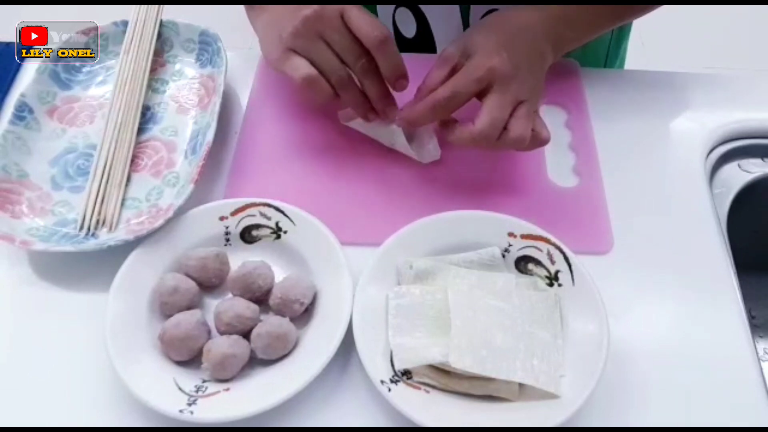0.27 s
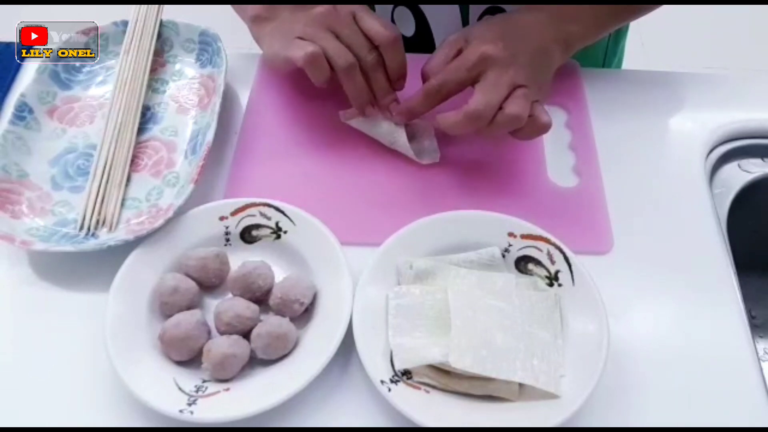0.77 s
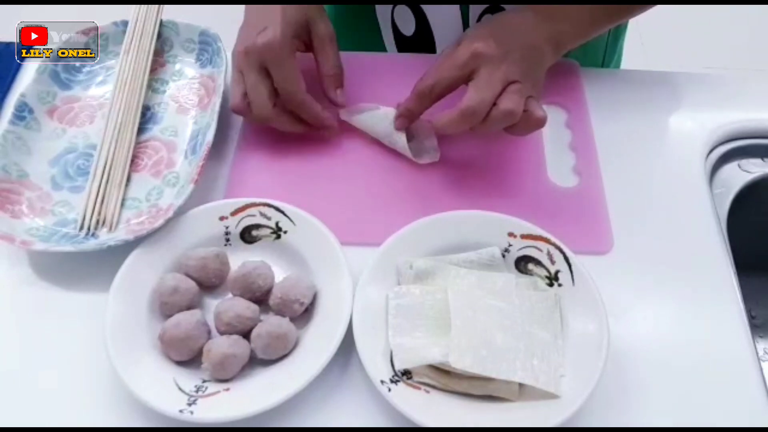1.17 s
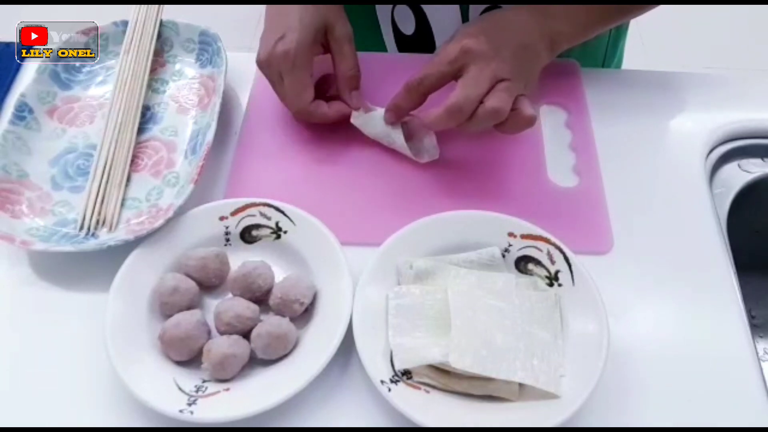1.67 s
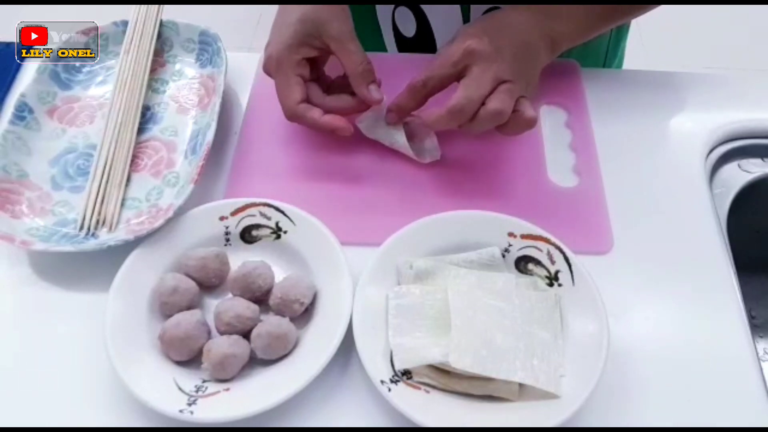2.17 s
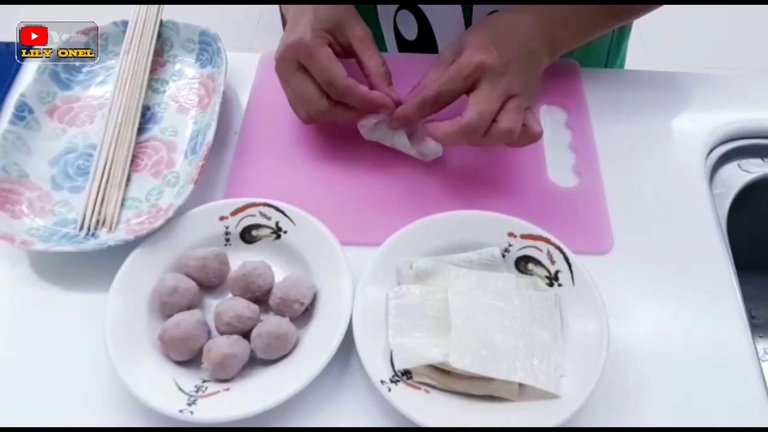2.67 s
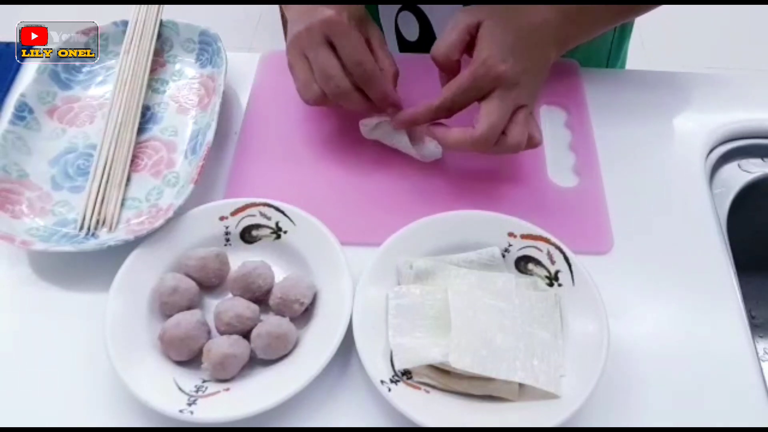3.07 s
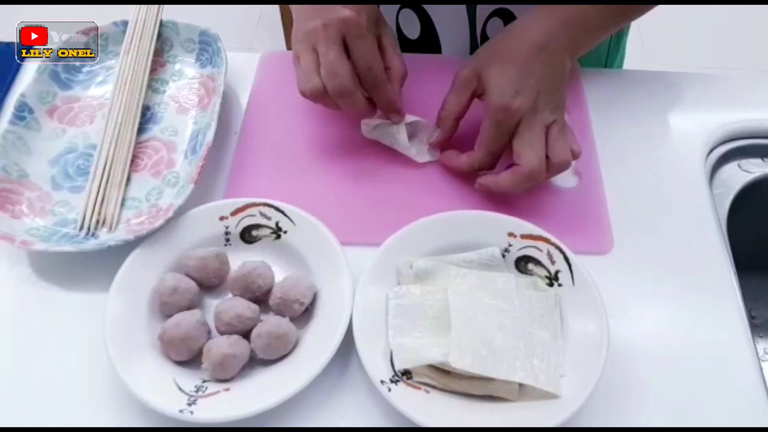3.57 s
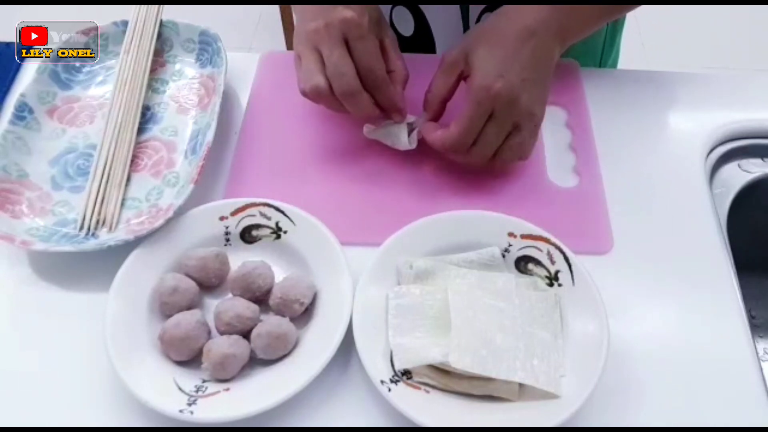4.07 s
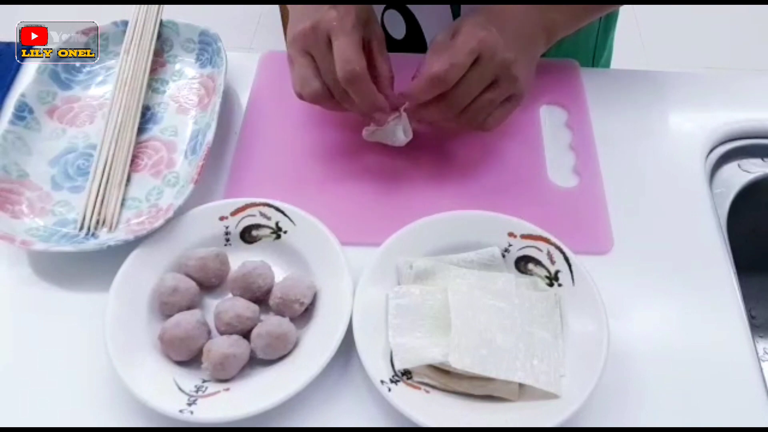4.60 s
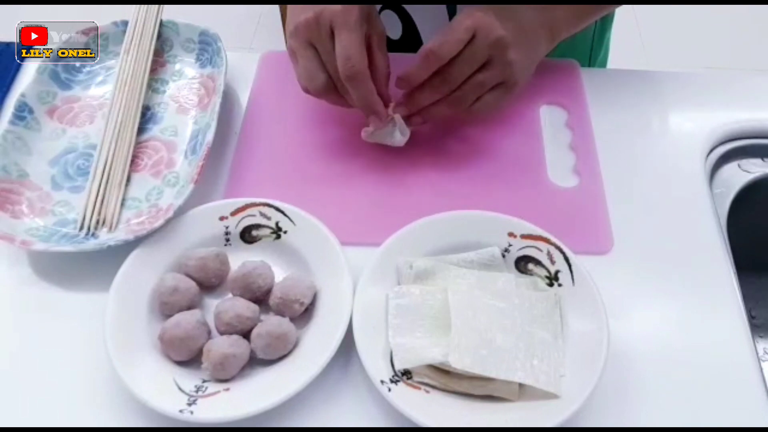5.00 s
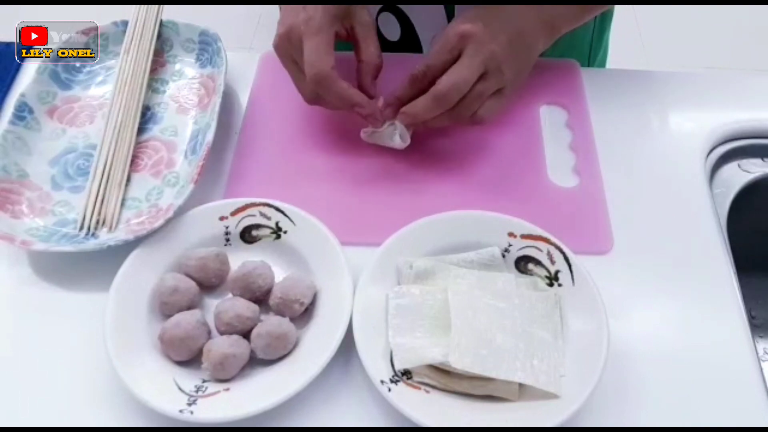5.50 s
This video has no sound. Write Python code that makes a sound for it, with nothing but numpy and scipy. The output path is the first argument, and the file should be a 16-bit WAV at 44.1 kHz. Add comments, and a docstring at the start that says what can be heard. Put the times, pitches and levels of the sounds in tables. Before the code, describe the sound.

Constant low electrical hum with a lightly fluttering buzz and airy fan drone, with a few faint finger taps, short skin rubs and thin wrapper rustles.

```python
"""A refrigerator compressor hums and buzzes in a quiet kitchen, with a mains tone, over the low drone of a fan.
Someone folds a pastry wrapper on a plastic cutting board; fingers softly knock and rub it a few times.
Machines: repeated shaft-turn waveform, mains harmonics, wavering tones and shaped noise.
Hands: impulses and stick-slip friction ring the board's modes; the wrapper is grainy noise, all in a short room tail."""
import sys
import numpy as np
from scipy import signal
from scipy.fft import rfft, irfft
from scipy.io import wavfile

SR = 44100
rng = np.random.default_rng(int(sys.argv[2]) if len(sys.argv) > 2 else 0)


def inscribe(sig):
    """Save sig as 16-bit PCM at rate SR to the path in sys.argv[1].

    A 1-D sig is mono; a 2-D sig holds one channel per row.
    Samples are clipped to [-1, 1] before scaling.
    """
    pcm = np.round(np.clip(np.atleast_2d(sig).T, -1, 1) * 32767)
    wavfile.write(sys.argv[1], SR, pcm.astype(np.int16))


N = 253310
SHAFT_HZ, MAINS_HZ, TOP_HZ = 59.275, 60, 15300
FREQS = np.arange(N // 2 + 1) * SR / N
TIME = np.arange(N) / SR
# Signs of one quantity split evenly between left and right
LEFT_RIGHT = np.array([[1], [-1]])


def undb(db):
    """Decibels to gain."""
    return 10 ** (np.asarray(db) / 20)


def unit(x):
    """Scale to an rms of 1."""
    return x / np.sqrt(np.mean(x ** 2))


def pan(left_minus_right_db):
    """Left and right gains for a level difference."""
    return undb(LEFT_RIGHT / 2 * left_minus_right_db)


def along(table, hz):
    """The columns of a spectrum table, interpolated on a log-frequency axis."""
    points_hz, *columns = np.transpose(table)
    return [np.interp(np.log(hz + 1), np.log(points_hz), column) for column in columns]


def resonance(hz, width_hz):
    """Complex response of one resonance, gain 1 at its centre."""
    damping = 1j * FREQS * width_hz
    return damping / (hz ** 2 - FREQS ** 2 + damping)


def walk(rate_hz):
    """Random drift with an rms of 1: noise under a Gaussian low-pass, without its mean."""
    lowpass = np.exp(-(FREQS / rate_hz) ** 2) * (FREQS > 0)
    return unit(irfft(rfft(rng.standard_normal(N)) * lowpass, N))


def diffuse(apart_hz):
    """Spectra of room noise at two microphones: alike in the bass, unrelated in the treble."""
    mid, side = rfft(rng.standard_normal((2, N)))
    alike = 1 / (1 + (FREQS / apart_hz) ** 4)
    return mid * np.sqrt((1 + alike) / 2) + LEFT_RIGHT * side * np.sqrt((1 - alike) / 2)


def fan(side_db=3.5, swell_db=4.0):
    """Narrow resonances waver in pitch and strength over a broad rush of air."""
    # Narrow tones, from drone to thin whine. Each row: frequency in Hz, width in Hz, level in dB rms.
    drone_tones = [(106.9, 3.36, -44.5), (119.9, 3.5, -58.5), (142.65, 5.35, -43), (147.9, 1, -41.5),
                   (159.9, 9, -48), (276.7, 1.6, -59.5), (325.3, 6.2, -57.5), (582, 5.4, -66),
                   (664.4, 2.26, -62.5), (9970, 74, -72)]
    # Moving air and faint hiss. Each row: frequency in Hz, density in dB per Hz, left minus right in dB.
    air_curve = [(15, -77, 0), (45, -67, 0), (95, -64, 1), (130, -59, 1.5), (210, -65, 2), (295, -75, 1),
                 (390, -73.5, 2), (500, -80.5, 2), (630, -79, 3), (720, -84, 3), (830, -86, 3),
                 (1050, -84.3, 4), (1400, -88.5, 6), (1545, -82.5, 5), (1800, -87, 4), (2100, -91.5, 2),
                 (2360, -89.5, 2), (2600, -93.5, 2), (2950, -96.5, 2), (4600, -101.5, 4), (7400, -100.5, 7),
                 (7950, -104, 4), (9900, -97.5, 0), (10300, -103, 0), (11000, -99.5, 0), (15000, -101, 0)]
    drone = 0
    for hz, width_hz, db in drone_tones:
        tone_hz = hz + width_hz / 2 * walk(2 * width_hz)
        tone = np.sin(2 * np.pi * np.cumsum(tone_hz) / SR)
        drone = drone + undb(db) * unit(tone * undb(swell_db * walk(2 * width_hz)))
    air_db, air_side_db = along(air_curve, FREQS)
    air_spectra = diffuse(apart_hz=397) * undb(air_db) * pan(air_side_db)
    air = irfft(air_spectra, N) * np.sqrt(SR / 2)  # density per Hz to samples
    return drone * pan(side_db) + air


def windings(side_db=3):
    """Magnetic hum: clean tones at even multiples of the mains rate."""
    # Each row: multiple of the mains rate, level in dB rms.
    mains_lines = [(2, -62), (4, -48.5), (6, -69), (8, -68), (10, -66)]
    tones = 0
    for multiple, db in mains_lines:
        turns = multiple * MAINS_HZ * TIME + rng.random()
        tones = tones + undb(db) * np.sin(2 * np.pi * turns)
    return np.sqrt(2) * tones * pan(side_db)


def compressor_lines(scatter_db=1.5, skew_limit_rad=0.69, opposed_skew_rad=2.89, port_lag_s=.00058):
    """Complex left and right strength of each multiple of the shaft rate, as the casing rattles every turn."""
    # Lines with their own level, most of them strong, a few faint.
    # Each row: multiple of the shaft rate, level in dB rms, left minus right in dB.
    hum_lines = [(1, -31.2, 1.8), (2, -52.0, 5.0), (3, -40.6, -0.4), (4, -56.7, 4.4), (5, -59.8, -0.2),
                 (6, -54.8, 0.7), (7, -59.2, 6.4), (8, -59.7, 5.1), (9, -53.9, -1.6), (10, -55.1, -0.1),
                 (11, -58.2, -4.6), (12, -62.0, -0.9), (13, -71.5, 12), (14, -80, 6), (15, -54.1, 3.7),
                 (16, -70.5, -11.2), (17, -68.7, 5.1), (18, -58.5, 4), (19, -63, 4.5), (20, -79, 6),
                 (21, -64, 14.4), (22, -62.6, 15.2), (23, -70.9, 9.6), (25, -71.2, 15.6), (26, -61.5, 18.5),
                 (27, -61.6, 2.2), (28, -60.8, 20.8), (29, -59.5, -3.0), (30, -69.3, 9.2),
                 (32, -68.7, 13.7), (33, -71.6, 11.5), (34, -71.4, 18.8), (38, -67.2, 5.9),
                 (39, -67.6, 8.7), (40, -63.4, -0.7), (41, -66.4, 1.3), (42, -68.7, 7.6), (84, -77, 5),
                 (98, -75.5, 6), (169, -74.5, 3), (186, -83, 2)]
    # All other lines. Each row: frequency in Hz, level of one line in dB rms, left minus right in dB.
    buzz_curve = [(770, -75, 10), (2000, -71, -3), (2550, -79, 8), (2720, -75.5, 12), (2980, -77.5, 2),
                  (3900, -79, 4), (4700, -84, 5), (5830, -80, 6.5), (7500, -81, 11), (7950, -90, 8),
                  (8500, -83, 0), (9900, -82, 3), (10300, -93, 5), (11000, -89, 6), (13500, -99, 10)]
    # Multiples of the shaft rate whose standing wave has a node between the microphones.
    opposed = (5, 7, 10, 12, 15, 17, 18, 19, 21, 22, 23, 28, 29, 33, 34)
    orders = np.arange(1, int(TOP_HZ / SHAFT_HZ))
    hz = orders * SHAFT_HZ
    # standing waves in the room give each line its own strength at each microphone
    scatter = scatter_db * rng.standard_normal((2, len(orders)))
    db, side_db = np.array(along(buzz_curve, hz)) + scatter
    # the short waves of the buzz arrive from all sides
    skew_rad = rng.uniform(0, 2 * np.pi, len(orders))
    for order, line_db, line_side_db in hum_lines:
        k = order - 1
        db[k], side_db[k] = line_db, line_side_db
        # lines with their own level reach the left a little earlier; across a node the microphones nearly oppose
        lag_rad = min(2 * np.pi * hz[k] * port_lag_s, skew_limit_rad)
        skew_rad[k] = opposed_skew_rad if order in opposed else lag_rad
    # a different delay for each line smears the knock of a turn into a lightly fluttering buzz
    smear_rad = 0.65 - 0.62 * orders ** 2 + (hz / 4000) ** 2 * rng.standard_normal(len(orders))
    phase_rad = smear_rad + LEFT_RIGHT / 2 * skew_rad
    return orders, undb(db) * pan(side_db) * np.exp(1j * phase_rad)


def compressor(drift=0.00019, wobble_turns=0.00096, shimmer_db=1.5, waver_db=0.65, groups=5):
    """Every shaft turn repeats one rattle; the speed drifts and neighbouring lines shimmer apart."""
    size = 8192  # samples of the one-turn waveform
    orders, lines = compressor_lines()
    turns = np.cumsum(SHAFT_HZ * (1 + drift * walk(2.25))) / SR
    sound = 0
    for group in range(groups):
        group_lines = lines * (orders % groups == group)
        spectra = np.pad(group_lines, ((0, 0), (1, 0)))  # no DC
        one_turn = irfft(spectra, size) * size / np.sqrt(2)
        # loose parts lead and lag the shaft slightly, so the flutter varies
        angle_turns = (turns + wobble_turns * walk(6.0)) % 1
        buzz = np.array([np.interp(angle_turns * size, np.arange(size), c) for c in one_turn])
        # the deep fundamental's group stays calm
        sound = sound + buzz * undb(shimmer_db * (group != 1) * walk(5.0))
    return sound * undb(waver_db * walk(6.0))


def wrapper(hz=6500, width_hz=9000, grain_db=4):
    """The thin pastry rustles in soft grainy swells as it is folded."""
    # Each row: start in seconds, length in seconds, level at the crest in dB.
    rustles = [(.66, .1, -60), (1.389, 0.051, -54.5), (1.604, 0.098, -55.5), (2.2, 0.15, -63),
               (2.645, 0.16, -61), (3.02, 0.11, -60), (3.794, 0.028, -54)]
    swell = 0
    for start_s, length_s, db in rustles:
        progress = np.clip((TIME - start_s) / length_s, 0, 1)
        swell = swell + undb(db) * np.sin(np.pi * progress)
    grains = rng.standard_normal((2, N)) * undb(grain_db * walk(300))
    return swell * unit(irfft(rfft(grains) * resonance(hz, width_hz), N))


def board():
    """Response of the cutting board to soft skin, which hardly excites the treble."""
    # Resonances of the board on the counter. Each row: frequency in Hz, width in Hz, relative level in dB.
    board_modes = [(257, 45, 1), (410, 60, 3), (533, 25, 7), (663, 25, 10), (860, 65, 8.5), (938, 50, 11),
                   (1071, 55, 10.5), (1190, 100, 1), (1548, 45, 3), (1730, 90, -4), (2300, 300, -18)]
    response = 0
    for k, (hz, width_hz, db) in enumerate(board_modes):
        response = response + (-1) ** k * undb(db) * resonance(hz, width_hz)
    return response / (1 + (FREQS / 2600) ** 4)


def rubs(slip_hz=420, uneven=0.41, squeak_width_hz=440, scrape=.6, press_share=0.64):
    """Skin sticks, slips in uneven jerks and scrapes; both ring the board, each stroke at its own pitch."""
    # Fingertip strokes; a dragged finger catches several times.
    # Each row: start in seconds, length in seconds, level in dB, squeak in Hz.
    strokes = [(1.225, .025, -48, 930), (1.299, .01, -50, 1000), (1.330, .02, -46.5, 1060),
               (1.41, .10, -52, 820), (1.522, .026, -41.5, 1000), (1.56, .068, -41.5, 1000),
               (1.614, .018, -37.5, 1060), (1.626, .021, -37, 1110), (1.641, .02, -39, 1190),
               (3.383, .022, -45.5, 950), (3.405, .04, -46, 1030), (3.708, .018, -47.5, 1020),
               (3.745, .07, -46.5, 1000)]
    slip_count = np.floor(np.cumsum(slip_hz * np.exp(uneven * walk(191.8))) / SR)
    slips = unit(np.diff(slip_count, prepend=0))
    friction = unit(slips + scrape * rng.standard_normal(N))
    spectrum, modes = 0, board()
    for start_s, length_s, db, squeak_hz in strokes:
        # press harder up to press_share of the stroke, then let go
        force = undb(db) * np.interp((TIME - start_s) / length_s, [0, press_share, 1], [0, 1, 0])
        body = modes * resonance(squeak_hz, squeak_width_hz)
        spectrum = spectrum + rfft(friction * force) * body / np.sqrt(np.mean(np.abs(body) ** 2))
    return irfft(spectrum, N)


def taps(scuff_db=-38, scuff_s=0.025, scuff_hz=1150, scuff_width_hz=1400):
    """Each contact rings the board once, with a short dull scuff; a fingernail is brighter than the pad."""
    # Fingertip contacts; a finger that lands hard chatters in several quick ones.
    # Each row: time in seconds, relative level in dB, brightness in dB per octave.
    contacts = [(1.3977, -16.5, 3), (1.4043, -17.5, 2), (1.4107, -21.5, 0), (1.4173, -20.5, -6),
                (3.3066, -27.5, 1), (3.8036, -25.5, 14), (3.872, -36, 1)]
    out, body = 0, board()
    for s, db, bright_db in contacts:
        tilt = undb(bright_db * np.log2(np.clip(FREQS, 400, 2500) / 1000))
        knock = irfft(body * tilt * np.exp(-2j * np.pi * FREQS * s), N)
        scuff_color = tilt * resonance(scuff_hz, scuff_width_hz) ** 2
        scuff = unit(irfft(rfft(rng.standard_normal(N)) * scuff_color, N))
        scuff = scuff * (TIME > s) * np.exp(-np.abs(TIME - s) / scuff_s)
        # the scuff grows more slowly with force than the knock does
        out = out + undb(db) * knock / np.abs(knock).max() + undb(scuff_db + db / 2) * scuff
    return out


def room(x, t60_s=0.6, wet_db=-13):
    """Hard kitchen walls add a short decaying tail, different at each microphone."""
    t = TIME[:SR // 2]
    tail = rng.standard_normal((2, len(t))) * np.exp(-np.log(1000) * t / t60_s)
    tail /= np.sqrt(np.sum(tail ** 2, axis=1, keepdims=True))
    return x + undb(wet_db) * signal.fftconvolve(x, tail, axes=1)[:, :N]


def fingers(side_db=6.5, tap_db=-4):
    """Taps, rubs and wrapper share one room; the hands work a little to the left."""
    hands = undb(tap_db) * taps() + rubs() + wrapper()
    return room(hands * pan(side_db))


def scene():
    """The machines and the hands together."""
    return fan() + windings() + compressor() + fingers()


def record(dry):
    """The recorder cuts the top of the treble with a steep elliptic low-pass."""
    lowpass = signal.ellip(10, .1, 80, TOP_HZ, fs=SR, output="sos")
    return signal.sosfilt(lowpass, dry)


dry = scene()
out = record(dry)
inscribe(out)
```